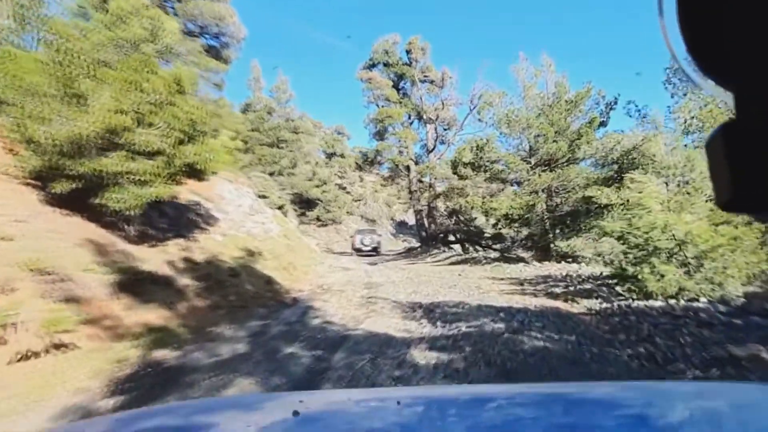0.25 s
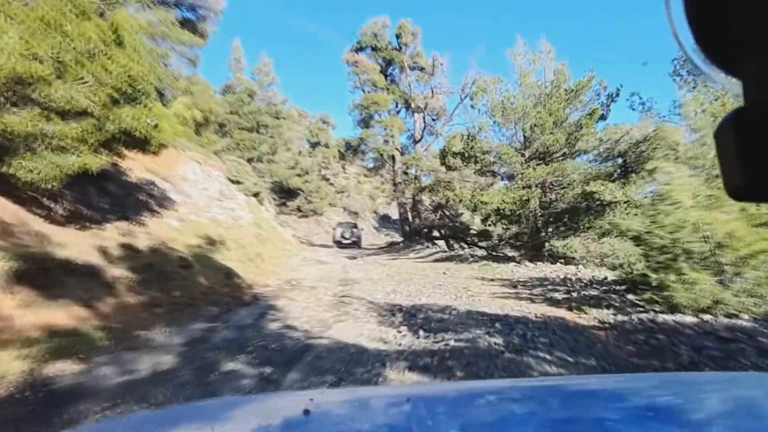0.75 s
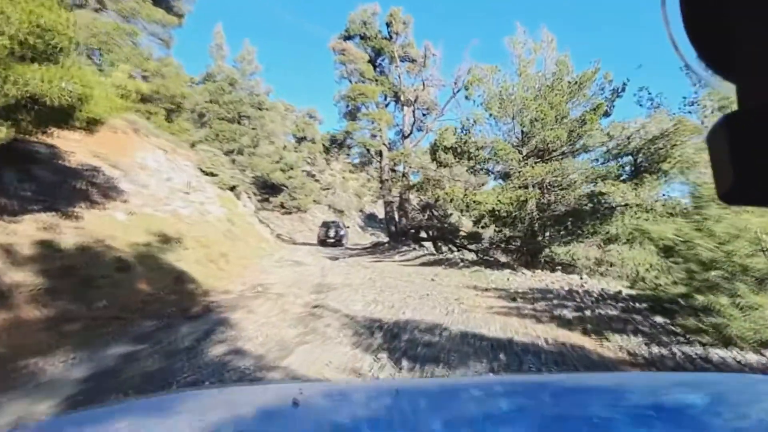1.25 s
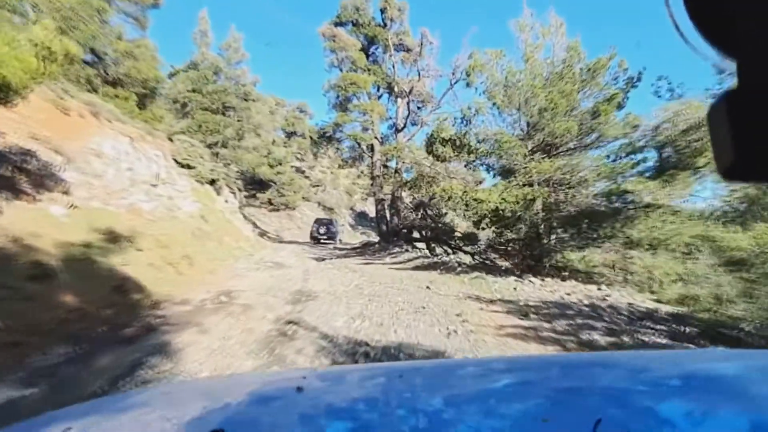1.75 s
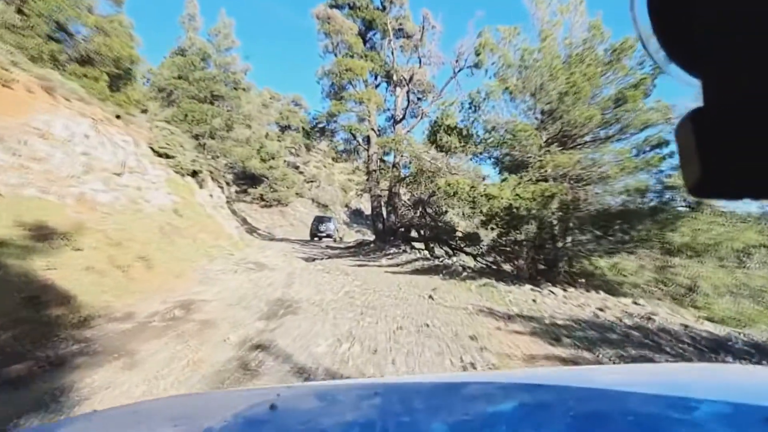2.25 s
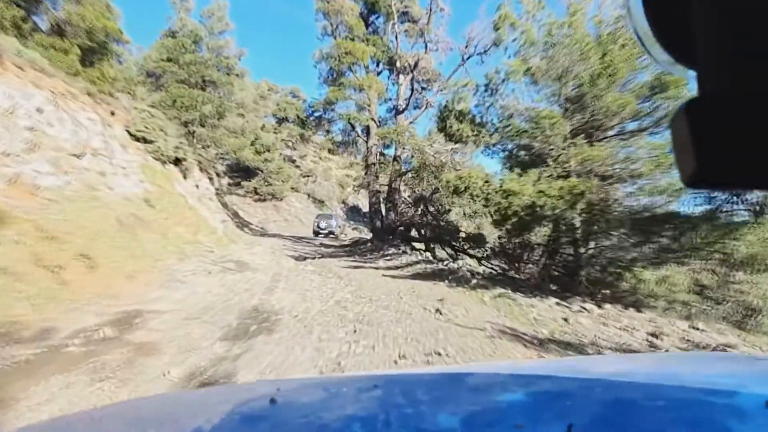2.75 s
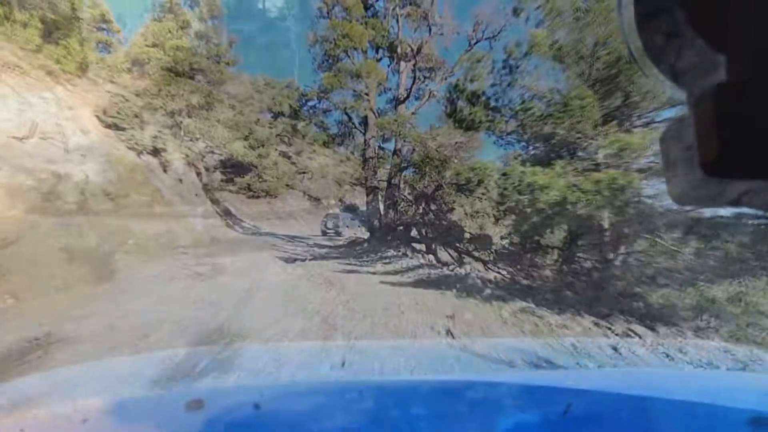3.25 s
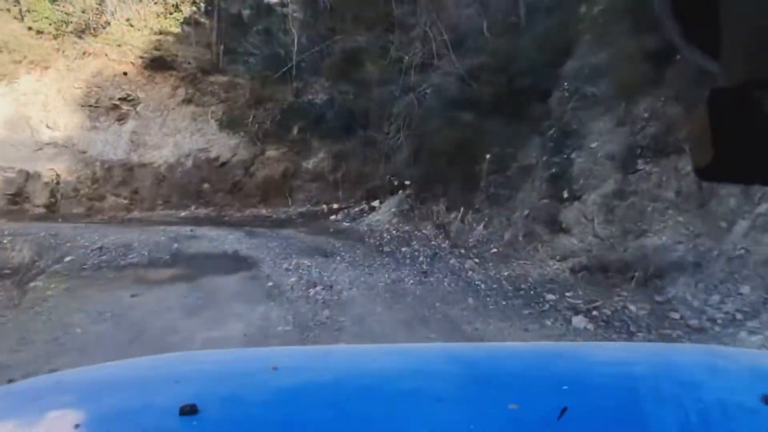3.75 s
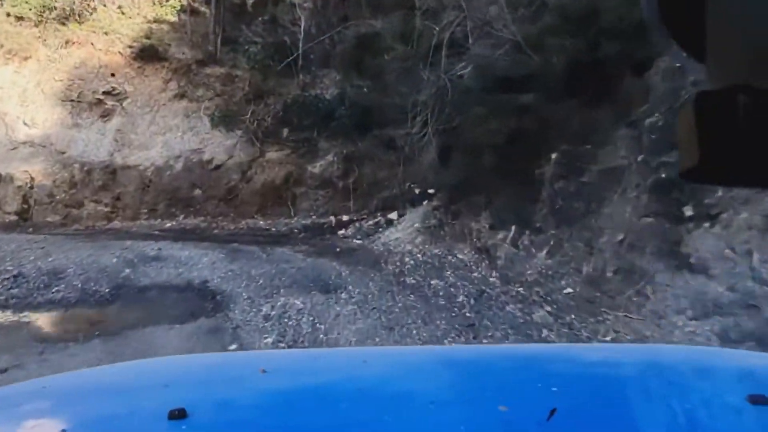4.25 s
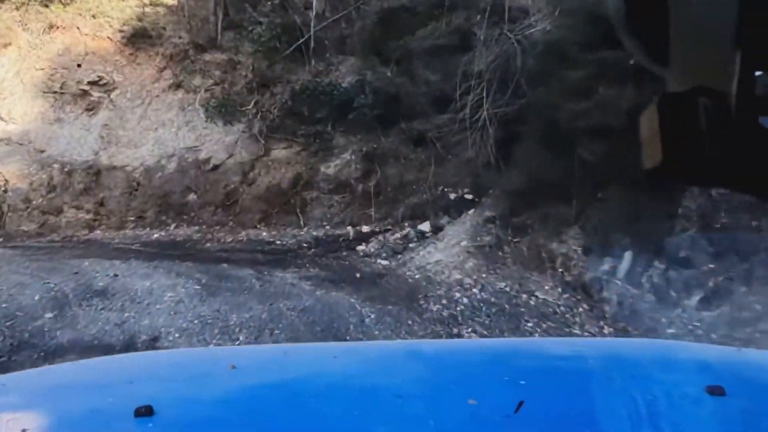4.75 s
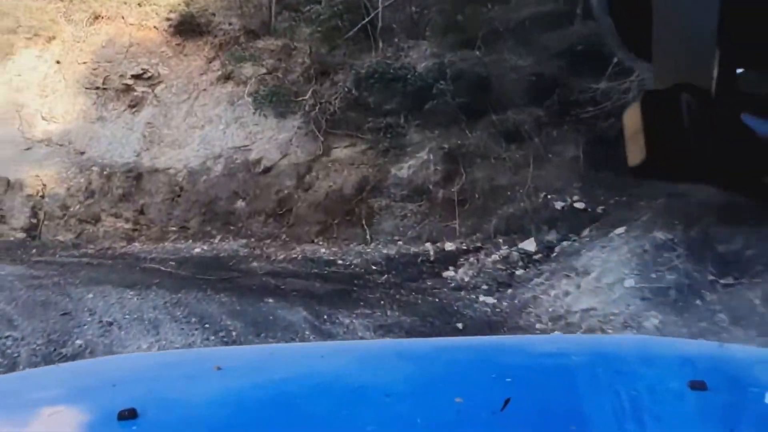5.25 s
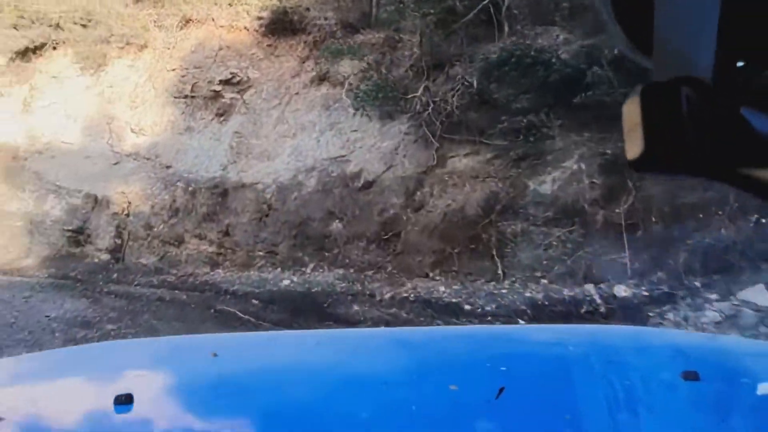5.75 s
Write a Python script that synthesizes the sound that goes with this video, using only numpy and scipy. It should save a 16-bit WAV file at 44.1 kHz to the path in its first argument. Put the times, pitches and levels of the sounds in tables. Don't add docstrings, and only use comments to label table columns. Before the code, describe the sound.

Cabin of a car bouncing along a rough dirt road, engine droning, floor thumping, loose plastic ticking, easing into a calmer stretch.

```python
import sys
import numpy as np
from scipy import signal
from scipy.fft import rfft, irfft, next_fast_len
from scipy.io import wavfile
from scipy.ndimage import uniform_filter1d

SR = 44100
rng = np.random.default_rng(int(sys.argv[2]) if len(sys.argv) > 2 else 0)


def materialize(psi):
    bounded = np.clip(np.atleast_2d(psi).T, -1, 1)
    quanta = np.round(bounded * 32767).astype(np.int16)
    wavfile.write(sys.argv[1], SR, quanta)


def convert_level_to_amplitude(level_db):
    exponent = np.asarray(level_db, float) / 20
    return 10 ** exponent


N = 265041
T = np.arange(N) / SR
SIZE = next_fast_len(N, True)
HZ = np.fft.rfftfreq(SIZE, 1 / SR) + 1e-3

# start in seconds, peak level in dB, ring frequency in Hz.
KNOCKS = [(0.582, -39, 305), (0.658, -32, 270), (0.769, -27.5, 248), (0.8983, -32, 304),
          (0.9066, -14.5, 224), (0.987, -32, 204.6), (1.393, -27.5, 414), (1.435, -40, 202),
          (2.546, -52, 251.7), (2.939, -36, 322), (3.031, -36, 203), (3.081, -27, 268.3),
          (3.144, -26.5, 410.7), (3.323, -35, 440), (3.363, -47, 260), (4.069, -31.5, 203),
          (4.615, -30.5, 215), (4.146, -29, 330), (5.139, -19, 229.4), (5.149, -25, 260), (5.114, -30, 330),
          (4.109, -27.5, 279), (5.653, -43, 315.3)]


def unit(x):
    return x / np.sqrt(np.mean(x ** 2))


def walk(rate):
    held = np.repeat(rng.standard_normal(int(N / SR * rate) + 2), 16)
    slow = unit(uniform_filter1d(uniform_filter1d(held, size=16), size=16))
    return np.interp(T * rate * 16, np.arange(len(slow)), slow)


def band(x, lo_hz, hi_hz):
    return signal.sosfilt(signal.butter(2, [lo_hz, hi_hz], "bandpass", fs=SR, output="sos"), x)


def add(out, s, sound):
    i = int(s * SR)
    out[:, i:i + sound.shape[1]] += sound[:, :N - i]


def swells(table):
    return sum(convert_level_to_amplitude(2 * db) * np.exp(-((T - s) / half) ** 2) for s, db, half in table)


def colour(points, column):
    # frequency in Hz, width in Hz, mid gain in dB, side gain in dB.
    cabin = [(388, 52, 4, 1.5), (439, 19, 4.5, 10), (746, 233, 7, 4), (1285, 240, 5, 3),
             (2185, 46, 1.5, -3), (3320, 2850, 12, 7)]
    hz, db = np.transpose(points)
    db = np.interp(np.log(HZ), np.log(hz), db)
    peaks_db = sum(m[column] / (1 + (2 * (HZ - m[0]) / m[1]) ** 2) for m in cabin)
    return convert_level_to_amplitude(db + peaks_db)


def crank_orders(table, orders):
    s, hz, load_db = np.transpose(table)
    turn = 2 * np.pi * np.cumsum(uniform_filter1d(np.interp(T, s, hz), size=SR // 12)) / SR
    out = np.zeros((2, N))
    for order, mid_db, side_db, follows in orders:
        db = mid_db + follows * np.interp(T, s, load_db) + 0.8 * walk(14)
        phase = round(order) * turn + 0.05 * walk(12) + 2 * np.pi * rng.random() + [[0], [1.25]]
        out += np.sqrt(2) * convert_level_to_amplitude(db) * convert_level_to_amplitude(np.array([[0], [side_db]])) * np.sin(phase)
    return out


def engine():
    # time in seconds, crank rate in Hz, load in dB.
    run_fast = [(0.0, 40.55, 0), (0.46, 40.75, -1), (0.65, 37.25, 1), (0.77, 35.5, -2), (1.02, 36.9, -1.3),
                (1.36, 37.32, 1), (1.62, 40.11, 5), (1.76, 39.81, 2.5), (2.08, 36.01, 0.5),
                (2.3, 35.75, -1), (2.66, 36.63, -0.8), (2.95, 34.23, -1.5), (3.16, 32.72, -3.5),
                (3.3, 33.33, -0.5), (3.5, 35.82, -10)]
    run_slow = [(3.56, 31.47, 2), (4.5, 31.48, 0.5), (4.62, 31.5, 2), (4.72, 31.29, -7), (5.01, 30.53, 2.5),
                (6.01, 29.42, -4)]
    # order, mid level in dB at zero load, side level in dB above mid,
    # gain in dB per dB of load.
    orders_fast = [(2, -28, -24, 1.06), (3, -35.5, -27, 1.5), (4, -33, -12.5, 0.23), (6, -50.5, -1, 1),
                   (8, -54, 5.5, -0.2), (5, -53, -6, 0), (7, -52.5, -4, .5), (10, -52.5, -3, .5),
                   (12, -58, 4, 1)]
    orders_slow = [(2, -34, -27, 0.93), (3, -45, -27, .3), (4, -38.5, -14.5, .1), (6, -53, -2.5, .1),
                   (8, -62.5, 13.5, .1)]
    fast = crank_orders(run_fast, orders_fast) * np.interp(T, [3.42, 3.62], [1, 0])
    slow = crank_orders(run_slow, orders_slow) * np.interp(T, [3.35, 3.6], [0, 1])
    return fast + slow


def boom(fast, rest_db=-30, side_db=-21.5, lean=0.055, steady=0.58, slow_db=-5, slow_hz=60.6):
    # frequency in Hz, density in dB per Hz.
    body = [(7, -38), (13, -2), (38, -0.5), (54, -3), (68, -5.5), (100, -17), (160, -23), (300, -49),
            (900, -130)]
    # time in seconds, peak level in dB, half-length in seconds.
    bumps = [(.07, -26, 0.025), (.35, -24.5, 0.089), (.65, -23, 0.44), (1.02, -16, 0.02), (1.3, -24, 0.2),
             (1.6, -18.5, 0.1), (1.87, -23, 0.079), (2.09, -17, 0.037), (2.19, -19.5, 0.043),
             (2.42, -28, 0.039), (0.2, -30, 0.037), (1.16, -27, 0.034), (1.45, -26, .04),
             (2.85, -26, 0.033), (2.3, -18, 0.059), (2.54, -18.5, 0.062), (2.68, -16.5, 0.086),
             (3.05, -23.5, 0.13), (3.23, -30, 0.04), (3.45, -29, .04), (3.78, -19, 0.15), (4.12, -18, 0.08),
             (4.4, -26, 0.12), (4.59, -17.5, 0.043), (4.77, -23.5, 0.059), (4.95, -19.5, 0.035),
             (5.1, -23.5, 0.16), (5.36, -20.5, 0.077), (5.56, -22, 0.053), (5.72, -20.5, 0.043),
             (5.97, -17.5, 0.066)]
    noise = rfft(rng.standard_normal((2, SIZE))) * colour(body, column=2)
    full, dull = (irfft(noise * convert_level_to_amplitude(db / (1 + (slow_hz / HZ) ** 6)), SIZE)[:, :N] for db in (0, slow_db))
    mid, side = unit(fast * full + (1 - fast) * dull)
    mid = unit(mid / uniform_filter1d(mid ** 2, size=SR // 10) ** (0.5 * steady))
    return np.sqrt(convert_level_to_amplitude(2 * rest_db) + swells(bumps)) * np.array([mid, convert_level_to_amplitude(side_db) * side - lean * mid])


def rings(table, t60, side_db, rough, pair, db_off, reach=1.5, below=1.45, rise=0.48):
    out, t = np.zeros((2, N)), T[:SR // 5]
    for s, db, hz in table:
        lag = 2 * np.pi * rng.random((2, 1)) * [[0], [1]]
        tone = np.sin(2 * np.pi * hz * t + lag) + 0.27 * np.sin(2 * np.pi * pair * hz * t + lag)
        fuzz = unit(band(rng.standard_normal((2, len(t))), hz / below, hz * reach))
        shape = np.minimum(t * hz / rise, 1) * np.exp(-np.log(1000) * t / t60)
        add(out, s, convert_level_to_amplitude(db + db_off) * shape * (tone + rough * fuzz) * convert_level_to_amplitude(np.array([[0], [side_db]])))
    return out


def knocks():
    return rings(KNOCKS, 0.086, side_db=-5.5, rough=0.23, pair=1.18, db_off=0.5, reach=2.63)


def cracks():
    # start in seconds, peak level in dB, ring frequency in Hz.
    contacts = [
        (1.394, -27, 700),
        (4.1475, -22, 800),
        (4.475, -35, 900),
        (4.508, -33, 900),
        (5.299, -36, 1010),
        (5.144, -31.5, 800),
        (5.849, -26, 900),
    ]
    return rings(contacts, 0.021, side_db=1.5, rough=0.39, pair=1.56, db_off=-1.0, reach=2.9)


def slaps(hold_s=0.014, lead_s=0.002, side_db=-1.0, low_side_db=3, top_side_db=-3, peaky_db=3, follows=0.35):
    # start in seconds, peak level in dB,
    # then relative to it 500-1000 Hz level in dB and 4-7 kHz level in dB.
    slaps_fast = [(0.364, -50.5, 17, -24), (0.42, -44.5, -6, -7.5), (0.5232, -42.5, 6, -23),
                  (0.7343, -46, -16, -6.5), (0.843, -38.5, -1, -14.5), (0.897, -36.5, 5, -33),
                  (0.9244, -45, 0, -20), (0.9949, -36, -8, -15.5), (1.1505, -40, 5, -16),
                  (1.3611, -42.5, -16, -23), (1.766, -38.5, -4, -20), (1.962, -37.5, -2, -27),
                  (1.581, -41.5, -23, -14), (1.6447, -30.5, 1, -17), (1.7082, -38.5, -7, -17),
                  (2.0937, -39.5, 5, -12.5), (2.163, -41.5, -9, -16), (2.2509, -41, -13, -14),
                  (2.389, -45.5, 10, -23), (2.673, -44, -13, -12), (2.7389, -42, 4, -16),
                  (2.809, -43.5, -13, -11), (3.0985, -49, 1, -25), (3.1459, -42.5, -13, -20),
                  (3.1916, -42.5, 7.5, -17), (3.272, -50, -15, -25), (2.9, -55, -5, -10),
                  (2.98, -48, -3, -12), (3.03, -40.5, -4, -16.5), (3.07, -46, 5.5, -14),
                  (3.223, -56, -8, -18), (0.473, -53, 11, -18), (0.101, -57, -5, -13), (0.29, -51, 2, -23),
                  (2.54, -43, 6, -11), (2.6, -49, 5, -12), (0.794, -47, 4, -18), (2.004, -49.5, 14, -23),
                  (2.221, -47, 10, -20)]
    slaps_slow = [(3.5182, -64, -5, -19), (3.573, -42, 0, -28), (3.6784, -39.5, 1, -12),
                  (3.7204, -47, -5, -11), (4.128, -39, 3, -14), (3.8534, -65, 13, -13),
                  (3.8963, -47, -7, -8.5), (3.9575, -43, -4, -14), (4.0118, -42.5, -4, -11.5),
                  (4.0632, -37, -4, -27), (4.1075, -44, 2, -24), (4.1478, -37.5, 8, -12),
                  (4.2395, -45, 11, -11.5), (4.27, -51, -19, -8), (4.9046, -50, 1, -15),
                  (5.005, -48.5, -7, -14), (5.1428, -55, 21.5, -17), (5.567, -48, 5, -9),
                  (5.7823, -53, 11, -8), (5.8512, -28, -1.5, -19), (5.858, -43.5, 3, -14),
                  (4.477, -51, 7, -10), (5.22, -51, 7, -13), (5.082, -51.5, 11, -9), (5.1, -47, 8, -11),
                  (4.03, -50, 6, -20), (4.55, -48, 8, -17), (4.65, -51.5, 14, -17), (5.44, -52, 11, -15),
                  (5.695, -52, 10, -13)]
    scuffs = [
        (0.2187, -43.5, 5, -12.5),
        (1.3896, -46, -3, -24),
        (2.42, -53, -9, -9),
        (4.5008, -52.5, 10, -3.5),
        (5.2294, -55, 15.5, -2.5),
    ]
    # 8-15 kHz peak level in dB, decay time t60 in seconds.
    kinds = [
        (-63, 0.15),
        (-69, 0.075),
        (-52, 0.29),
    ]
    out, t = np.zeros((2, N)), T[:4096]
    table = [row + kind for rows, kind in zip((slaps_fast, slaps_slow, scuffs), kinds) for row in rows]
    uneven = uniform_filter1d(rng.standard_normal((len(table), 1, 2049)), size=9)
    modes = convert_level_to_amplitude(peaky_db * unit(uneven))
    x = irfft(rfft(rng.standard_normal((4, len(table), 2, len(t)))) * modes)
    dull = unit(band(x[0], 270, 910)) * convert_level_to_amplitude(np.array([[0], [low_side_db]]))
    bright = unit(band(x[1], 1470, 3440)) * convert_level_to_amplitude(np.array([[0], [side_db]]))
    edge = unit(band(band(x[2], 3600, 6800), 3600, 6800)) * convert_level_to_amplitude(np.array([[0], [side_db]]))
    top = unit(band(x[3], 7500, 15000)) * convert_level_to_amplitude(np.array([[0], [top_side_db]]))
    for k, (s, db, low_db, edge_db, top_db, t60) in enumerate(table):
        shape = np.minimum(t / 0.00039, 1) * np.exp(-np.log(1000) * np.maximum(t - hold_s, 0) / t60)
        parts = bright[k] + convert_level_to_amplitude(low_db + 4.0) * dull[k] + convert_level_to_amplitude(edge_db + 7.0) * edge[k]
        parts = parts + convert_level_to_amplitude(top_db + follows * (db + 38.5) - db) * top[k]
        add(out, s - lead_s, convert_level_to_amplitude(db - 10.5) * shape * parts)
    return out


def taps():
    # start in seconds, peak level in dB, ring frequency in Hz.
    taps_fast = [(0.905, -27.5, 1180), (0.905, -28.5, 720), (1.393, -30, 630), (1.6445, -35, 1280),
                 (1.661, -34, 1010), (0.9777, -38, 1270), (1.036, -37.5, 1234), (1.1402, -36, 1260),
                 (1.6519, -33, 1280), (1.6985, -37, 1224), (1.8665, -38, 1180), (2.2916, -36, 1120),
                 (2.387, -36.5, 1210), (2.6325, -38, 1260), (2.733, -41, 1261)]
    taps_slow = [(3.375, -38.5, 1159), (3.458, -38, 1130), (3.577, -37, 1260), (3.662, -40, 1140),
                 (3.9988, -39, 1070), (3.3235, -39, 646), (4.0848, -28.5, 1181), (4.146, -29, 1140),
                 (4.1944, -30.5, 1133), (4.236, -38.5, 1360), (4.279, -39, 1150), (4.353, -51, 1130),
                 (4.4398, -45, 1080), (4.478, -42, 1150), (4.512, -37.5, 1080), (5.086, -40, 1050),
                 (5.1436, -29.5, 1150), (5.153, -35, 1106), (5.146, -27, 628.6), (5.235, -46, 1160),
                 (5.2983, -39, 1060), (5.4612, -39, 1130), (5.4946, -41.5, 1267), (5.7951, -43, 1240),
                 (5.8496, -26.5, 907), (5.857, -26, 828), (4.146, -27.5, 676), (4.156, -31, 707),
                 (4.108, -36, 1150), (4.13, -40, 1000), (4.25, -38, 720), (4.2365, -32.5, 685),
                 (5.238, -38, 780), (5.898, -44, 1050)]
    return rings(taps_fast + taps_slow, 0.058, side_db=0.5, rough=0.25, pair=1.07, db_off=-0.5)


def pings():
    # start in seconds, peak level in dB, ring frequency in Hz.
    clips = [(1.362, -39, 3000), (2.392, -37.5, 2231), (2.781, -39.5, 2200), (1.6445, -31.5, 2240),
             (1.719, -53, 3320), (1.775, -36, 1690), (0.897, -40, 2795), (0.905, -32.5, 2002),
             (3.102, -41.5, 2150), (3.196, -48, 2200), (3.273, -42.5, 2228), (3.577, -50, 2311),
             (4.107, -43, 2890), (4.154, -46, 3450), (4.632, -46, 1880), (4.152, -38, 2540),
             (4.243, -38, 1880), (4.271, -49, 3380), (0.152, -50, 4200), (0.258, -44, 1710),
             (0.296, -45, 1520), (0.315, -45, 2150), (1.17, -40, 1780), (1.391, -45, 2070),
             (1.415, -45, 2160), (1.583, -37, 1709), (1.95, -44, 2280), (2.149, -45, 2820),
             (2.163, -52, 5730), (2.195, -44, 2070), (2.514, -42, 1950), (2.624, -44, 1791),
             (2.756, -37, 1881), (2.809, -41, 2880), (3.044, -46, 2900), (3.145, -47, 3300)]
    return rings(clips, 0.05, side_db=0.5, rough=0.5, pair=1.06, db_off=-2, rise=4)


def squeak():
    # start in seconds, peak level in dB, ring frequency in Hz.
    modes = [
        (2.092, -56, 7980),
        (2.1, -53, 5700),
        (2.102, -50, 8050),
        (2.1, -57, 11470),
        (2.1, -60, 13380),
        (2.1, -61, 14500),
    ]
    return rings(modes, 0.09, side_db=1, rough=0.8, pair=1.3, db_off=-1.5, reach=1.02, below=1.08)


def panel():
    # start in seconds, peak level in dB, ring frequency in Hz.
    jolts = [(0.05, -33, 400), (0.182, -28.5, 400), (0.225, -36, 403), (0.286, -34, 386), (0.344, -32, 344),
             (0.40, -35, 440), (0.465, -37, 425), (0.687, -37, 358.2), (0.98, -31, 430), (1.16, -31, 300),
             (1.22, -31, 435), (1.362, -35, 440), (1.52, -29.5, 385), (1.576, -35, 440), (1.619, -29, 400),
             (1.698, -34, 371), (1.94, -39, 382), (2.09, -32, 320), (2.217, -29, 405), (2.419, -33, 352.7),
             (2.547, -33, 393), (2.634, -32, 423), (2.73, -31, 420), (2.85, -32, 445), (4.755, -31, 330),
             (4.93, -34, 320), (4.96, -36, 400), (5.255, -34, 320)]
    return rings(jolts, 0.14, side_db=-6, rough=0.13, pair=1.0, db_off=-1.5, reach=1.1, below=1.18, rise=2.9)


def frame():
    # start in seconds, peak level in dB, ring frequency in Hz.
    jolts = [(0.4, -45, 458), (0.78, -48, 288), (0.897, -38, 520), (1.39, -44, 450), (1.55, -45, 455),
             (1.63, -45, 460), (1.75, -43, 470), (1.93, -43, 460), (1.98, -48, 470.5), (2.1, -45, 453),
             (2.28, -45, 460), (2.36, -46, 460.6), (2.54, -46, 475), (3.14, -41, 463)]
    return rings(jolts, 0.16, side_db=12, rough=0.15, pair=1.08, db_off=-1.5, reach=1.1, below=1.15, rise=3)


def rattle(rate=30, spread_db=4.5, top_db=6, t60=0.06, db=-10.0):
    when, size = rng.random((int(rate * N / SR), 2)).T
    hits = np.zeros(N)
    hits[(when * N).astype(int)] = convert_level_to_amplitude(db + np.minimum(-spread_db * np.log(1 - size), top_db))
    return signal.lfilter([1], [1, -np.exp(-np.log(1000) / (t60 * SR))], hits)


def road(fast, swell_db=-1.27, flicker_db=1.5, shake_hz=400, own=1.0, shudder_db=-11.5, shudder_s=0.011):
    # frequency in Hz, density in dB per Hz.
    mid_fast = [(100, -13), (175, -2.5), (339, -8.5), (433, -12), (476, -14.5), (824, -16), (1230, -17),
                (1540, -25), (2200, -31.5), (3880, -43.5), (6710, -35.5), (8740, -46), (16000, -50)]
    side_fast = [(100, -58), (175, -7), (359, -4.5), (459, -5), (520, -4), (586, -5), (682, 0.5), (764, -5),
                 (950, -5), (1200, -4.5), (1960, -23.5), (2980, -28), (3880, -32.5), (7660, -45),
                 (16000, -58.5)]
    mid_slow = [(88, -46), (150, 0), (169, -1.5), (259, 1.5), (514, -14.5), (624, -8.5), (941, -17.5),
                (1170, -14), (1480, -23.5), (3490, -42), (4320, -41), (6510, -34.5), (16000, -50)]
    side_slow = [(88, -52), (150, -24), (244, -13.5), (280, -2), (545, -4), (689, 4), (745, -5.5),
                 (1390, -7.5), (2020, -26.5), (3920, -35), (6510, -36.5), (7040, -38.5), (16000, -58)]
    # time in seconds, roughness in dB.
    track = [(0, -2), (.18, -1), (.47, 0), (.7, -1.5), (.95, 1.2), (1.24, 0.9), (1.74, 1.5), (1.87, 1),
             (2.14, 0), (2.41, 1.5), (2.75, -0.26), (3.05, -1), (3.25, -1.5), (3.65, -0.9), (4.12, 0),
             (4.37, -1.5), (4.69, -0.6), (5.1, 0), (5.57, 1.5), (6.01, 1.5)]
    borders_hz = (600, 1600, 7000)
    # fast level in dB, slow level in dB, gain in dB per dB of roughness.
    zones = [
        (-36, -41, 1.2),
        (-49, -51, 1.5),
        (-53.5, -60, 1.5),
        (-64, -72.5, 1),
    ]
    # time in seconds, peak level in dB, half-length in seconds.
    gusts = [(.2, -63.5, 0.06), (.92, -66, 0.11), (1.72, -63, 0.14), (2.11, -56, 0.012), (2.42, -72, 0.028),
             (2.55, -63, 0.035), (2.75, -64.5, 0.13), (1.2, -59.5, 0.046), (1.4, -76, .05),
             (3.7, -70.5, 0.038), (4.15, -61, 0.016), (4.55, -65, 0.082), (5.07, -73, 0.076),
             (5.26, -64, 0.046), (5.6, -63.5, 0.16)]
    shapes = [np.array([colour(m, column=2), convert_level_to_amplitude(side_db) * colour(d, column=3)])
              for m, d, side_db in ((mid_fast, side_fast, -2.5), (mid_slow, side_slow, -1))]
    zone = np.searchsorted(borders_hz, HZ)
    power = [np.array([np.sum(g[0, zone == z] ** 2) / len(HZ) for z in range(4)]) for g in shapes]
    noise = np.array([rfft(rng.standard_normal((2, SIZE))) * g for g in shapes])
    rough_db = np.interp(T, *np.transpose(track))
    level = [convert_level_to_amplitude(2 * k * rough_db) * (fast * convert_level_to_amplitude(2 * a) + (1 - fast) * convert_level_to_amplitude(2 * b)) for a, b, k in zones]
    shudders = [(s + shudder_s / 2, db + shudder_db, shudder_s) for s, db, _ in KNOCKS]
    level[0] = level[0] + swells(shudders)
    level[-1] = level[-1] + swells(gusts)
    swell, out = walk(4.196), np.zeros((2, N))
    common = rattle()
    jolts = [common + own * rattle() for _ in zones]
    for octave in np.arange(6.5, 14.1, 0.5):
        hz = 2 ** octave
        mask = np.cos(np.pi * np.clip(np.log2(HZ) - octave, -0.5, 0.5)) ** 2
        z = np.searchsorted(borders_hz, hz)
        a, b = irfft(noise * mask, SIZE)[..., :N]
        mix = a * np.sqrt(fast / power[0][z]) + b * np.sqrt((1 - fast) / power[1][z])
        db = swell_db * swell + flicker_db * walk(12)
        shaken = 1 + jolts[z] ** 2 / (1 + (shake_hz / hz) ** 4)
        out += mix * convert_level_to_amplitude(db) * np.sqrt(level[z] * shaken)
    return out


def scene():
    dissolve_s = (3.03, 3.6)
    fast = np.interp(T, dissolve_s, [1, 0])
    driving = engine() + boom(fast)
    loose = slaps() + taps() + pings() + squeak()
    struck = knocks() + cracks() + panel() + frame()
    mid, side = driving + struck + loose + road(fast)
    return np.array([convert_level_to_amplitude(-0.62) * (mid + side), convert_level_to_amplitude(-0.41) * (mid - side)])


def thin_treble(mid_side, coarse=0.2, coarse_hz=6900, kept_db=6, patchy_db=2.5, air_db=1.5):
    # frequency in Hz, mid share 0-1, side share 0-1.
    empty = [(6300, 0, 0), (6400, .01, .9), (6950, .02, .7), (7000, .28, .7), (7600, .24, .74),
             (7800, .1, .78), (8500, .22, .86), (9500, .22, .92), (15200, .22, .96), (15700, .3, .95),
             (15800, 1, 1)]
    padded = np.pad(mid_side, ((0, 0), (0, 4096)), "reflect")
    hz, s, z = signal.stft(padded, SR, nperseg=2048)
    near = np.sqrt(uniform_filter1d(np.abs(z) ** 2, size=32, axis=1)) + 1e-12
    loud = np.log(near)
    loud = loud - loud.mean(axis=2, keepdims=True)
    chance = unit(uniform_filter1d(rng.standard_normal((2, len(hz) // 8 + 1, len(s))), size=3))
    tall = np.repeat(chance[0], 32, axis=0)[:len(hz)] + 0.8 * loud[0]
    upper = np.repeat(chance[0, ::-1], 16, axis=0)[:len(hz)] - 0.3 * loud[0]
    patches = np.where(hz[:, None] < 7700, tall, upper)
    thin = np.repeat(chance[1], 8, axis=0)[:len(hz)]
    strips = thin + 1.1 * loud[1]
    rank = np.array([patches, strips]).argsort(axis=2).argsort(axis=2) / len(s)
    at, *share = np.transpose(empty)
    keep = rank >= np.array([np.interp(hz, at, c) for c in share])[..., None]
    treble = hz[:, None] > coarse_hz
    lost = treble & ((np.abs(z) < coarse * near) | (thin < -1.1))
    keep = keep * ~lost * np.array([treble ** 0, convert_level_to_amplitude(kept_db * treble)])
    uneven_db = patchy_db * np.clip(thin, -2, 2) + air_db * (hz[:, None] > 11500)
    keep = keep * convert_level_to_amplitude(treble * uneven_db)
    return signal.istft(z * keep, SR, nperseg=2048)[1][:, :N]


def top_cut(x):
    return signal.sosfilt(signal.butter(12, 16640, fs=SR, output="sos"), x)


def record(dry):
    mid_side = np.array([dry[0] + dry[1], dry[0] - dry[1]]) / 2
    closing = np.minimum((N - np.arange(N)) / (0.0012 * SR), 1)
    mid, side = thin_treble(mid_side) * closing
    return top_cut(np.array([mid + side, mid - side]))


dry = scene()
out = record(dry)
materialize(out)
```